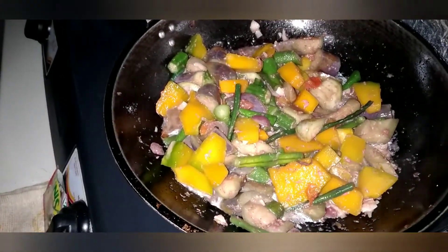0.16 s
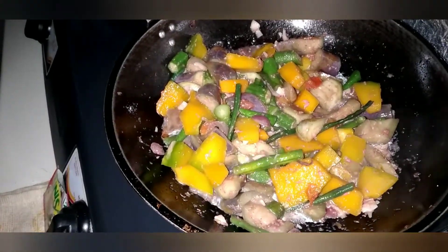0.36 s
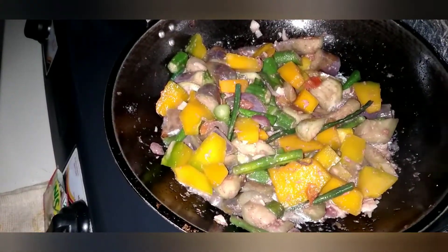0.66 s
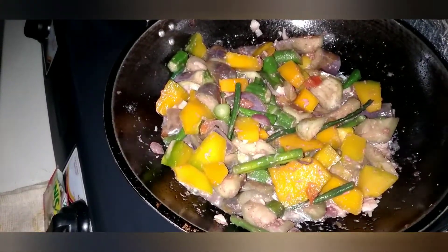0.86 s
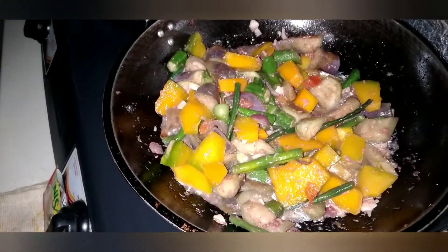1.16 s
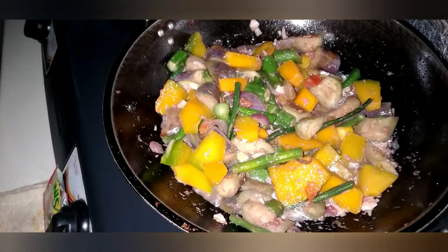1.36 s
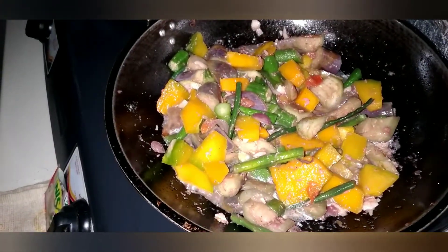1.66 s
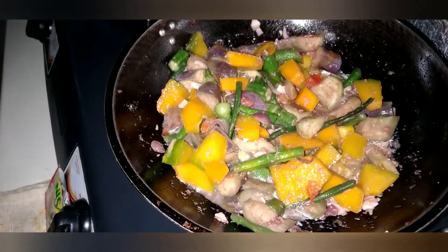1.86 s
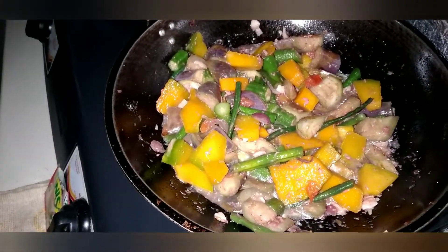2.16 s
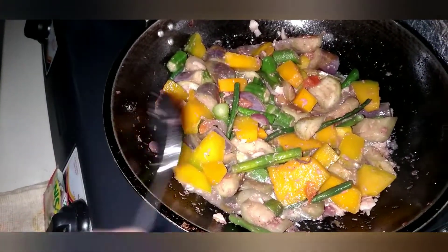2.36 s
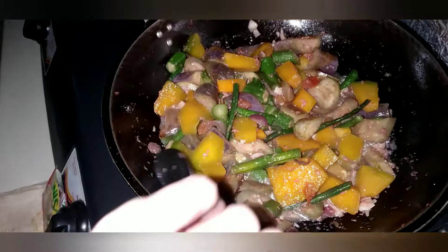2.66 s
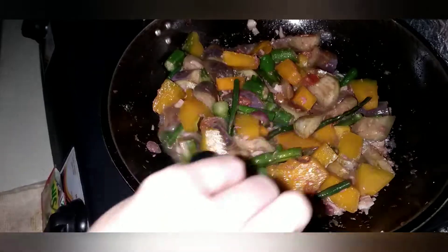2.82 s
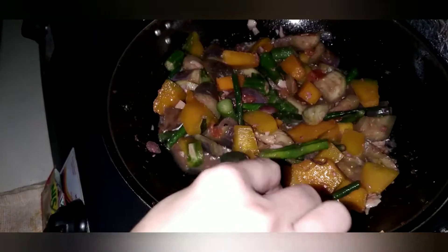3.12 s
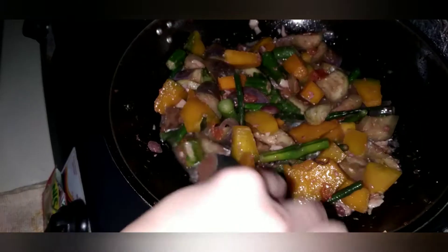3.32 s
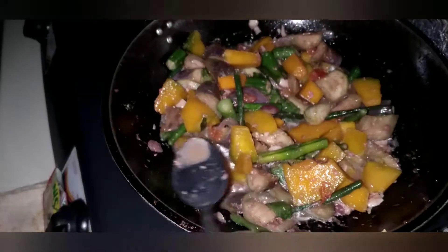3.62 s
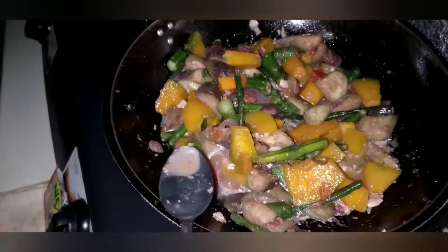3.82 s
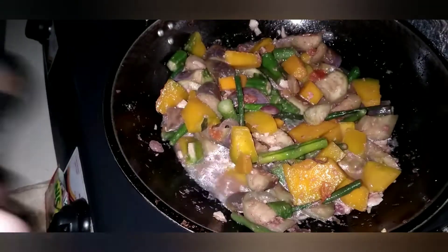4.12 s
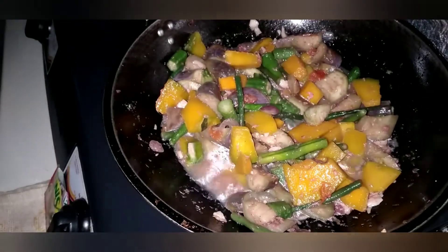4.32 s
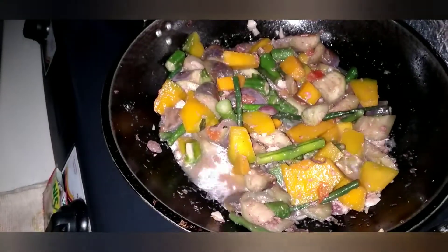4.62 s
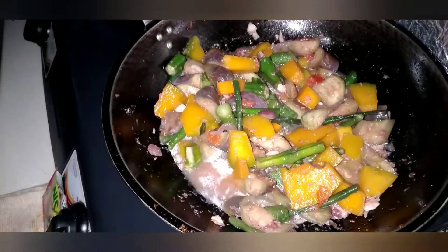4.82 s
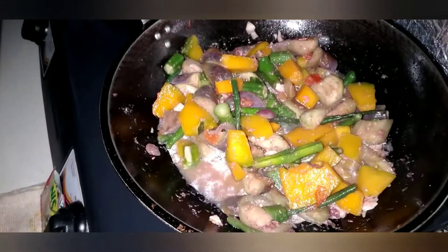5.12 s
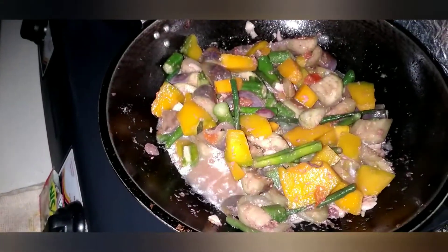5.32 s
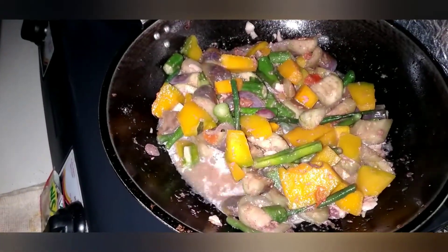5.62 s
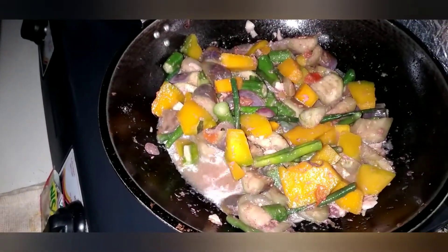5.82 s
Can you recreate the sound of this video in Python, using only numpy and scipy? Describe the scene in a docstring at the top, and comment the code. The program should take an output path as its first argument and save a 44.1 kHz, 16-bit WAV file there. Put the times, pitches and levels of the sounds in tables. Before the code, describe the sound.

A gentle, bright sizzle runs throughout, heard by a phone's two microphones just over the pan. Scattered ticks and spits sit on top, with a muffled simmer beneath. First come two quick object knocks nearby, later a hard, brief spoon clink, faint stirring scrapes with a thin squeak, and a softer wok clack. Short room reflections; burner hum stays low.

```python
"""Sizzle of vegetables in a wok: a fizz of noise under random tiny bubble bursts; spits and ticks are filtered snaps.
Thick sauce simmers and plops as gated noise with gliding gurgles; soft scrapes and rustles, in the pan and beside it,
are flickering noise, and the spoon squeaks thinly. It clinks on the wok and knocks it once more; two clatters come
from beside the stove: noise blows, ringing modes. The burner rushes, rumbles and hums underneath; the small kitchen
adds short tails. All is heard through the two microphone ports of a phone just above the wok."""
import sys
import numpy as np
from scipy import signal
from scipy.fft import rfft, irfft, next_fast_len
from scipy.io import wavfile
from scipy.ndimage import uniform_filter1d

SR = 44100
rng = np.random.default_rng(int(sys.argv[2]) if len(sys.argv) > 2 else 0)


def bounce(signal):
    """Save signal as a 16-bit WAV file at the path given by the first command-line argument."""
    frames = np.transpose(np.atleast_2d(signal))
    limited = np.clip(frames, -1, 1)
    pcm = np.round(limited * 32767).astype(np.int16)
    wavfile.write(sys.argv[1], SR, pcm)


N = 263625
TIME_S = np.arange(N) / SR

# spectrum of fizz and bursting bubbles: (frequency [Hz], level [dB])
SIZZLE_SPECTRUM = [(300, -24.5), (1200, -6.5), (2500, -2), (4500, 0.5), (7300, 0.5), (10500, -2),
                   (13000, -5), (15500, -5)]
# brief swells and dips of the sizzle: (middle [s], half length [s], change [dB])
SIZZLE_SWELLS = [(.9, 0.074, -5), (2.702, 0.12, 1), (5.27, 0.11, 3.5), (5.387, 0.039, 4),
                 (5.837, 0.16, 1.5)]
# snaps and ticks at set times, loud and faint: (time [s], level [dB], pitch [Hz], t60 [s], left minus right [dB])
TIMED_SNAPS = [(.7368, -43.5, 6500, 0.053, 3), (1.0172, -49, 7240, 0.014, -3), (1.7152, -46, 6650, .025, 0),
               (2.0160, -46, 11200, .012, -2), (2.1084, -39.5, 9600, 0.011, -5),
               (2.2178, -34, 9300, 0.0095, 7), (2.6975, -43, 9000, .012, -1),
               (2.7210, -43, 10200, .014, -1), (2.781, -43.5, 6200, .07, 0), (3.6762, -50, 9900, 0.011, 7),
               (4.1162, -46.5, 7400, .018, -2), (4.8522, -44, 7900, .01, -2),
               (5.1495, -48, 6500, 0.056, -1), (5.174, -49, 3400, 0.042, 4), (5.414, -48, 6800, 0.049, -2),
               (5.7208, -42, 11300, 0.024, -1), (5.7218, -36.5, 6700, 0.045, 0),
               (5.7654, -30.3, 6000, 0.007, 5.5), (5.7657, -39.5, 3900, .013, 4)]
# dull plops of thick sauce: (time [s], level [dB])
SAUCE_PLOPS = [(2.485, -52.5), (2.822, -54), (4.554, -49.5), (5.245, -54.5), (5.418, -52.5), (5.85, -56.5)]
# spectrum of the steam in the sauce: (frequency [Hz], level [dB])
SAUCE_SPECTRUM = [(90, -14), (190, -1), (350, 1), (700, -3), (1200, -3), (2000, -2.5), (4000, -26),
                  (9000, -38)]
# soft scrapes and rustles, in the pan and beside it: (time [s], level [dB], rise [s], left minus right [dB])
SOFT_SCRAPES = [(0.509, -45, .039, 0), (1.85, -48.5, 0.029, 2), (2.53, -54.5, .04, -3),
                (2.68, -51.5, 0.018, -5), (2.778, -43, .005, 0.5), (2.82, -56, .004, 1),
                (4.551, -43.5, 0.0012, 4), (5.17, -49, 0.0032, 4)]
# spectrum of the scrapes: (frequency [Hz], level [dB])
SCRAPE_SPECTRUM = [(200, -10.5), (700, 0.5), (1300, 1.5), (2500, -2.5), (5000, -2.5), (7500, 0),
                   (11000, -4.5), (15500, -2.5)]
# spoon on bare metal, graze then blow: (time [s], level [dB], rise [s], t60 [s], left minus right [dB])
SPOON_CLINKS = [(2.4507, -30.5, 0.0026, 0.03, -2), (2.4553, -21.5, .0005, 0.038, -3.5),
                (2.4559, -13.7, 0.00033, 0.011, -1.5)]
# spectrum of that blow at each port: (frequency [Hz], left [dB], right [dB])
CLINK_SPECTRA = [(200, -33, -30), (900, -30, -28), (1700, -20.5, -20), (2300, -15, -18), (3020, -8, -15.5),
                 (3970, -17, -12.5), (5150, 0, 5.5), (6200, -7, -5.5), (7340, -7, -3.5), (9050, -3.5, -10),
                 (10400, -8, -5), (11700, -12, -14.5), (13200, -10, -15), (15500, -27, -14)]
# ring of the spoon: (frequency [Hz], level [dB], t60 [s])
SPOON_MODES = [(2885, 3.5, .115), (3596, -2, .08), (4480, -7, .1), (5001, -11, .2), (5490, -6, .13),
               (5932, -5, .17), (7413, -4.5, .25), (7830, -5, .14), (8112, -3, .12), (10300, 1, .2),
               (13150, -8, .2), (13720, -10, .4)]
# spoon on the full wok, left-port gains used for both: (time [s], level [dB], rise [s], t60 [s], left minus right [dB])
WOK_KNOCKS = [(3.6114, -32, 0.0022, 0.028, 1), (3.6153, -31, 0.00036, 0.029, 6)]
# spectrum of the knock: (frequency [Hz], level [dB])
KNOCK_SPECTRUM = [(300, -20), (750, -30), (1130, -11.5), (2100, -19), (2550, -10), (2950, -26), (3600, -2),
                  (4400, -6), (5000, -11), (5900, -9), (7300, -21), (8200, -9), (9200, -15), (10600, -14),
                  (15500, -17)]
# ring of the wok, damped by the food: (frequency [Hz], level [dB], t60 [s])
WOK_RING_MODES = [(1010, -8, .15), (1640, -2, .043), (3610, 2, .07), (5870, -1, .1), (6900, -7, .053),
                  (8190, 2, .06), (10280, 2, .05)]
# things knocking beside the stove: (time [s], level [dB], rise [s], t60 [s], left minus right [dB])
CLATTER_BLOWS = [(.6498, -33.5, 0.0003, 0.069, 1.5), (.6535, -35.5, 0.0022, 0.055, 3),
                 (.7764, -33.5, 0.00036, 0.042, 5.5), (.7795, -38, 0.002, 0.075, 0),
                 (.7935, -47, .001, 0.046, -2)]
# blow spectrum of the first thing: (frequency [Hz], level [dB])
FIRST_THING_SPECTRUM = [(550, -17), (850, -8), (1600, -1), (2100, -9), (2700, -1), (4600, -5), (6200, -2.5),
                        (7400, -5.5), (15500, -2)]
# ring of the first thing: (frequency [Hz], level [dB], t60 [s])
FIRST_THING_RING = [(986, -5, .08), (1240, -5, .14), (1530, -2.5, .15), (1680, 0, .09), (1900, -1, .08),
                    (2480, -2, .08), (2780, -2, .08), (3620, 6, .09), (4280, 3, .09), (7520, 2, .1),
                    (11130, 4, .11)]
# blow spectrum of the second thing: (frequency [Hz], level [dB])
SECOND_THING_SPECTRUM = [(250, -19), (600, -7), (880, -3.5), (1050, -14), (1600, 0), (2050, -10),
                         (3000, -2), (3450, -15), (4250, 1.5), (5100, -4), (10500, -4), (15500, -7)]
# ring of the second thing: (frequency [Hz], level [dB], t60 [s])
SECOND_THING_RING = [(890, -5, .11), (1583, 0, .14), (1830, -2, .1), (2186, -3, .13), (2509, -2.5, .12),
                     (2778, -6, .14), (4188, -2, .08), (7400, 2, .11), (10330, 1.5, .11), (11130, 0, .087)]
# rush of the burner and the kitchen: (frequency [Hz], level [dB])
BURNER_SPECTRUM = [(20, -7), (60, -8), (90, -1.5), (125, -0.5), (160, -0.5), (220, -3.5), (300, -9.5),
                   (700, -9), (1100, -11.2), (1800, -12.5), (2500, -19), (5000, -21)]
# deep rumble of the kitchen: (frequency [Hz], level [dB])
RUMBLE_SPECTRUM = [(15, -5), (25, -5), (38, 1), (65, -1.5), (100, -28), (300, -48)]
# how unlike the two ports hear sound from all sides: (frequency [Hz], side minus mid [dB])
PORT_WIDTH = [(120, -27.5), (225, -22), (290, -7.5), (380, -6.5), (700, -4), (1100, -.5)]
# resonances of the two microphone ports: (frequency [Hz], left [dB], right [dB])
PORT_RESONANCES = [(200, -0.5, -1), (710, 4, 2.5), (4770, 0.5, -2), (6040, 4.5, -2.5), (7370, 10.5, -0.5),
                   (8540, 3.5, 0), (9520, -3, 6), (10770, -3.5, 10.5), (11460, -5, 8), (13900, -10, 0.5),
                   (15400, -2.5, -4)]

SIZZLE_DB = -54.5
# tiny bubbles open softly; below the pitch they grow more alike in strength
BUBBLE_RISE_S, BUBBLE_SNAPPY_HZ = 0.000052, 9800
# random spits: mean level and centre pitch
SMALL_SPITS_PER_S, SMALL_SPIT_DB, SMALL_SPIT_HZ, SMALL_SPIT_T60_S = 6, -50.5, 10600, 0.01
SPIT_WIDTH_HZ = 3100  # bandwidth of a snap with a t60 of 10 ms; longer ones are purer
SPIT_CRACK_DB = -8  # broad crack, against the pitched snap
PLOP_RISE_S, PLOP_T60_S = 0.0064, 0.32
SIMMER_DB, SIMMER_FLUTTER_DB, SIMMER_DB_PER_SIZZLE_DB = -65, 4.5, 1.2
# level against the steam
GURGLES_PER_S, GURGLE_DB, GURGLE_LOW_HZ, GURGLE_HIGH_HZ = 90, -6, 420, 2400
GURGLE_CYCLES, GURGLE_GLIDE = 22, .2  # cycles per t60; share by which the pitch rises in that time
SLIDE_T60_S, SLIDE_T60_PER_RISE = 0.16, 1.5  # gentler starts die away more slowly
SQUEAK_HZ = 13780
CLINK_RING_DB, CLINK_RING_SIDE_DB = -27.5, 7  # against the blow; left minus right
KNOCK_LEFT_DELAY_S = .000136
RUMBLE_DB, RUMBLE_EBB_DB_PER_S = -58, 1
RING_BLUR_HZ = 6  # things still touch as they ring, so each pitch wavers over this width
PORTS_UNLIKE_HZ = 7000  # from here up a ring reaches the two ports in any phase
BURST_EVEN_HZ = 700  # the burst's power is evened out over bands of this width
TOP_HZ = 15720


def sizzle():
    """A fine fizz of steam under crackles that come in little flurries."""
    flurry = walk(rate=55)
    fizz = air() * undb(0.76 * flurry + 1.1 * walk(rate=8.3))
    crackle = bubbles(per_second=1700 * undb(4.5 * flurry), spread_db=3.1, side_db=9, t60=.0028)
    return colour(unit(fizz + crackle), SIZZLE_SPECTRUM) * undb(heat_db())


def heat_db():
    """Level of the sizzle: steady, with a few smooth swells and dips."""
    return SIZZLE_DB + sum(db * np.exp(-((TIME_S - s) / half) ** 2) for s, half, db in SIZZLE_SWELLS)


def bubbles(per_second, spread_db, side_db, t60, size=256):
    """Tiny bubbles burst, each with its own pitch, length and place; the high ones are the most unequal."""
    start = np.flatnonzero((rng.random(N) < per_second / SR)[:-size])
    pitch, strength, place, length, *phases = rng.random((len(start), 6)).T[:, :, None]
    hz = 1200 + 14800 * pitch
    t = TIME_S[:size]
    unequal_db = spread_db * np.minimum(hz / BUBBLE_SNAPPY_HZ, 1) ** 2
    grain = undb(-unequal_db * (np.log(np.maximum(strength, .002)) + np.sqrt(2)))
    grain = grain * np.minimum(t / BUBBLE_RISE_S, 1) * fade(t, t60 * 2 ** (2 * length - 1))
    where = (start[:, None] + np.arange(size)).ravel()
    ports = []
    for sign, phase in zip((1, -1), phases):
        side_gain = undb(sign * side_db * (place - .5))
        wave = grain * side_gain * np.sin(2 * np.pi * (hz * t + phase))
        ports.append(np.bincount(where, wave.ravel(), N))
    return unit(np.array(ports))


def spits():
    """Snaps and ticks at set times and small random spits: each a broad, quickly damped pitch."""
    out = np.zeros((2, N))
    t = TIME_S[:SR // 10]
    rows = list(TIMED_SNAPS)
    for when, strength, pitch in rng.uniform(-1, 1, (int(SMALL_SPITS_PER_S * N / SR), 3)):
        s = (when + 1) / 2 * TIME_S[-len(t) - 1]
        db = SMALL_SPIT_DB + 3 * strength
        rows.append((s, db, SMALL_SPIT_HZ * (1 + .15 * pitch), SMALL_SPIT_T60_S, -4))
    for s, db, hz, t60, side_db in rows:
        width_hz = SPIT_WIDTH_HZ * np.sqrt(.01 / t60)
        band_hz = np.clip([hz - width_hz / 2, hz + width_hz / 2], 500, TOP_HZ)
        cavity = signal.butter(2, band_hz, "band", fs=SR, output="sos")
        crack = rng.standard_normal((2, len(t)))
        pitched = unit(signal.sosfilt(cavity, crack))
        snap = (pitched + undb(SPIT_CRACK_DB) * crack) * fade(t, t60)
        start = int(s * SR)
        out[:, start:start + len(t)] += undb(db) * pan(side_db) * snap
    return scatter(out, t60=0.15, db=-7.0)


def sauce():
    """Steam pushes through thick sauce: an uneven simmer that follows the sizzle, with larger plops."""
    plops = [(s, db, PLOP_RISE_S, PLOP_T60_S, 0) for s, db in SAUCE_PLOPS]
    boil_db = SIMMER_DB_PER_SIZZLE_DB * (heat_db() - SIZZLE_DB)
    flutter_db = SIMMER_FLUTTER_DB * np.tanh(walk(rate=12))
    simmer = undb(SIMMER_DB + boil_db + flutter_db)
    steam = np.hypot(contacts(plops), simmer)
    return colour(steam * air(), SAUCE_SPECTRUM) + undb(GURGLE_DB) * steam * gurgle()


def gurgle():
    """Bubbles open at the top of the sauce: the larger, the lower and longer, each gliding upward."""
    out = np.zeros((2, N))
    t = TIME_S[:SR // 10]
    for when, size, strength, place in rng.random((int(GURGLES_PER_S * N / SR), 4)):
        hz = GURGLE_HIGH_HZ * (GURGLE_LOW_HZ / GURGLE_HIGH_HZ) ** size
        t60 = GURGLE_CYCLES / hz
        start = int(when * (N - len(t)))
        cycles = hz * t * (1 + GURGLE_GLIDE * t / t60 / 2)
        wave = np.sin(2 * np.pi * cycles) * fade(t, t60)
        out[:, start:start + len(t)] += strength * np.sqrt(hz) * pan(10 * (place - .5)) * wave
    return unit(scatter(out, t60=.15, db=-3))


def scrapes():
    """Soft scrapes in small uneven slips: noise with a fast random level."""
    slides = [(s, db, rise, SLIDE_T60_S + SLIDE_T60_PER_RISE * rise, side_db)
              for s, db, rise, side_db in SOFT_SCRAPES]
    return colour(contacts(slides) * air() * undb(1.3 * walk(rate=310)), SCRAPE_SPECTRUM)


def squeak():
    """Dragged over the pan, the spoon sings thinly and unevenly at one pitch."""
    drag = contacts([(2.675, -49, .012, .4, -2)])  # (time [s], level [dB], rise [s], t60 [s], left minus right [dB])
    return drag * walk(rate=180) * np.sin(2 * np.pi * SQUEAK_HZ * TIME_S)


def clink():
    """A hard contact, so close that each port hears its own colour, sets the spoon ringing."""
    table = np.array(CLINK_SPECTRA)
    hz = table[:, 0]
    blow = np.vstack([colour(x, np.column_stack([hz, db]))
                      for x, db in zip(burst(SPOON_CLINKS), table[:, 1:].T)])
    tone = undb(CLINK_RING_DB) * pan(CLINK_RING_SIDE_DB) * ring(SPOON_CLINKS[-1:], SPOON_MODES)
    return scatter(blow, t60=0.18, db=-9.0) + tone


def knock():
    """The full wok answers with a short clack that reaches the left port a little later."""
    blow = colour(burst(WOK_KNOCKS), KNOCK_SPECTRUM)
    clack = (blow + undb(-7) * ring(WOK_KNOCKS[:1], WOK_RING_MODES))[0]
    left = np.interp(TIME_S - KNOCK_LEFT_DELAY_S, TIME_S, clack)
    return scatter(np.array([left, clack]), t60=0.11, db=-8.5)


def clatter():
    """Two things land in turn, each with its own blows and ring; further off, they carry more of the kitchen."""
    first_blow = colour(burst(CLATTER_BLOWS[:2]), FIRST_THING_SPECTRUM)
    second_blow = colour(burst(CLATTER_BLOWS[2:]), SECOND_THING_SPECTRUM)
    first_ring = undb(-10) * ring(CLATTER_BLOWS[1:2], FIRST_THING_RING)
    second_ring = undb(-5.5) * ring(CLATTER_BLOWS[3:], SECOND_THING_RING)
    return scatter(first_blow + second_blow, t60=0.23, db=-2.0) + first_ring + second_ring


def burner():
    """Gently wavering rush, a slowly ebbing rumble and a faint hum."""
    rush = undb(-54.0) * colour(air() * undb(0.53 * walk(rate=9)), BURNER_SPECTRUM)
    rumble_noise = air() + undb(-18) * rng.standard_normal((2, N))  # the second part differs at each port
    rumble = colour(rumble_noise, RUMBLE_SPECTRUM) * undb(RUMBLE_DB - RUMBLE_EBB_DB_PER_S * TIME_S)
    hum = undb(-65.0) * np.sin(2 * np.pi * 120 * TIME_S + 0.92 * walk(rate=3.9))
    return rush + rumble + hum


def contacts(rows):
    """Strength of each contact at both ports: it builds up and dies away."""
    force = np.zeros((2, N))
    for s, db, rise, t60, side_db in rows:
        span = slice(int(s * SR), int((s + .6) * SR))
        t = TIME_S[span] - s
        shape = np.clip(t / rise, 0, 1) * fade(np.maximum(t - rise, 0), t60)
        force[:, span] += undb(db) * pan(side_db) * shape
    return force


def burst(rows, size=16384):
    """Rough noise of hard contacts, its power evened out over all pitches."""
    start = int(rows[0][0] * SR) - size // 10
    force = contacts(rows)[:, start:start + size]
    spectrum = rfft(force * two_ports(rng.standard_normal((2, size))))
    power = uniform_filter1d(np.abs(spectrum) ** 2, int(BURST_EVEN_HZ * size / SR), axis=1)
    strength = np.linalg.norm(force, axis=1, keepdims=True)
    out = np.zeros((2, N))
    out[:, start:start + size] = irfft(spectrum * strength / np.sqrt(power))
    return out


def ring(rows, modes):
    """Every blow sets the same modes ringing; the low ones reach both ports nearly in step."""
    t = TIME_S[:SR // 2]
    out = np.zeros((2, N))
    for s, db, rise, *_ in rows:
        start = int((s + rise) * SR)
        for hz, mode_db, t60 in modes:
            phase = rng.random() + min(hz / PORTS_UNLIKE_HZ, 1) * rng.random((2, 1))
            waver = np.cumsum(rng.standard_normal(len(t))) * np.sqrt(RING_BLUR_HZ / (2 * np.pi * SR))
            tone = np.sin(2 * np.pi * (hz * t + phase + waver)) * fade(t, t60)
            out[:, start:start + len(t)] += undb(db + mode_db) * tone
    return out


def scatter(x, t60, db):
    """Add a diffuse tail of reflections."""
    t = TIME_S[:SR // 2]
    tail = two_ports(rng.standard_normal((2, len(t)))) * fade(t, t60)
    return x + undb(db) * convolve(x, tail / np.linalg.norm(tail, axis=1, keepdims=True))


def two_ports(x):
    """Sound from all sides: long waves reach both ports alike, short ones nearly unrelated."""
    size = x.shape[1]
    width = undb(np.interp(np.fft.rfftfreq(size, 1 / SR), *np.transpose(PORT_WIDTH)))
    gains = np.array([np.ones_like(width), width]) / np.hypot(1, width)
    mid, side = irfft(rfft(x) * gains, size)
    return np.array([mid + side, mid - side])


def air():
    """White noise as the two ports hear it."""
    return two_ports(rng.standard_normal((2, next_fast_len(N, True))))[:, :N]


def walk(rate):
    """Smooth random course of rms near 1, with about rate new values per second."""
    hold = max(int(SR / rate), 1)
    steps = np.repeat(rng.standard_normal(N // hold + 1), hold)
    return unit(uniform_filter1d(steps, hold)[:N])


def colour(x, points):
    """Shape a white sound without changing its power."""
    h = response(points)
    return convolve(x, h / np.linalg.norm(h))


def response(points, size=8192):
    """Minimum-phase impulse response through (frequency [Hz], level [dB]) points."""
    hz, db = np.transpose(points)
    grid_hz = np.maximum(np.fft.rfftfreq(size, 1 / SR), 1)
    gain = undb(np.interp(np.log(grid_hz), np.log(hz), db))
    cepstrum = irfft(np.log(gain))
    cepstrum[1:size // 2] *= 2  # fold to the causal side
    cepstrum[size // 2 + 1:] = 0
    return irfft(np.exp(rfft(cepstrum)))


def convolve(x, impulse):
    """Pass each channel through an impulse response."""
    return signal.fftconvolve(np.atleast_2d(x), np.atleast_2d(impulse), axes=1)[:, :N]


def fade(t, t60):
    """Exponential decay by 60 dB per t60 from t = 0, silent before."""
    return (t >= 0) * np.exp(-np.log(1000) * np.maximum(t, 0) / t60)


def pan(db):
    """Left and right gains for a level difference."""
    return undb(np.array([[db], [-db]]) / 2)


def unit(x):
    """Scale to rms 1."""
    return x / np.sqrt(np.mean(x ** 2))


def undb(db):
    """Decibels to gain."""
    return 10 ** (np.asarray(db) / 20)


def scene():
    """Everything at and beside the stove."""
    return sizzle() + spits() + sauce() + clink() + knock() + scrapes() + squeak() + clatter() + burner()


def record(dry):
    """Each microphone port has its own resonances; the phone cuts the top."""
    ports = np.array(PORT_RESONANCES)
    heard = convolve(dry, [response(ports[:, [0, 1]]), response(ports[:, [0, 2]])])
    return signal.sosfilt(signal.ellip(10, .2, 80, TOP_HZ, fs=SR, output="sos"), heard)


dry = scene()
out = record(dry)
bounce(out)
```